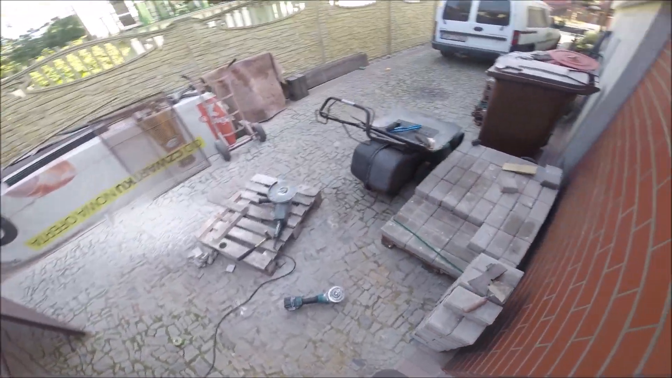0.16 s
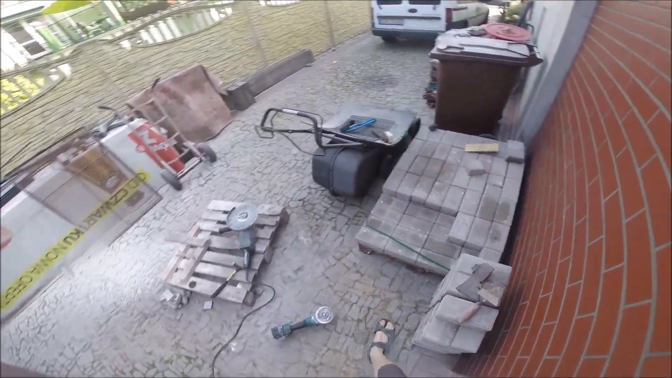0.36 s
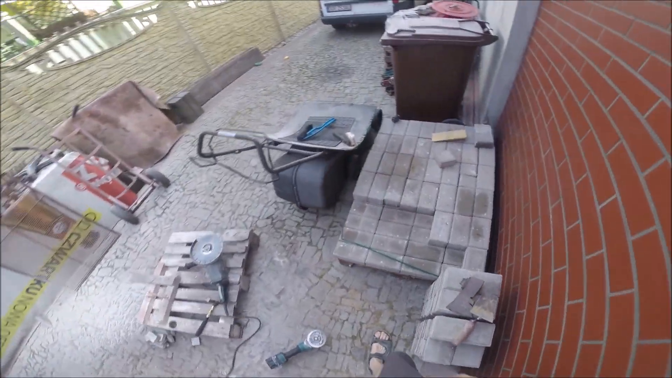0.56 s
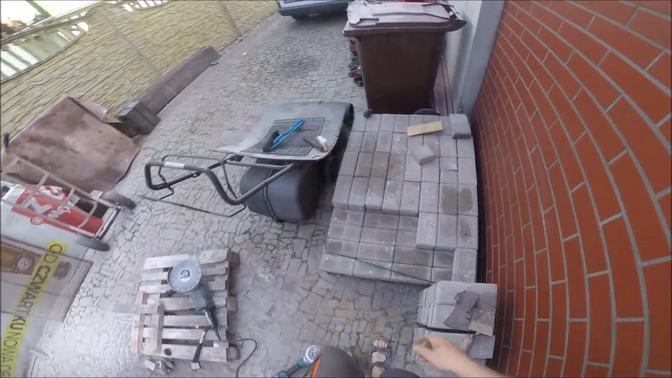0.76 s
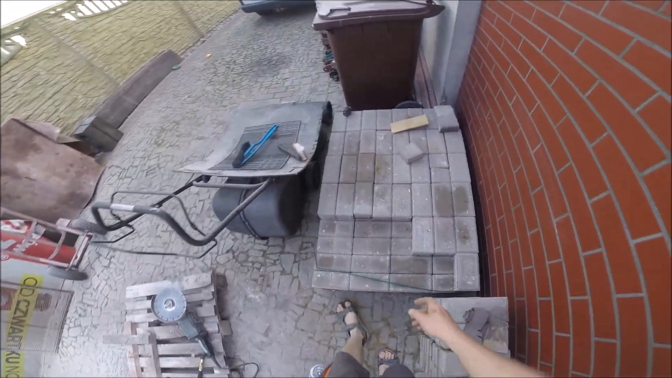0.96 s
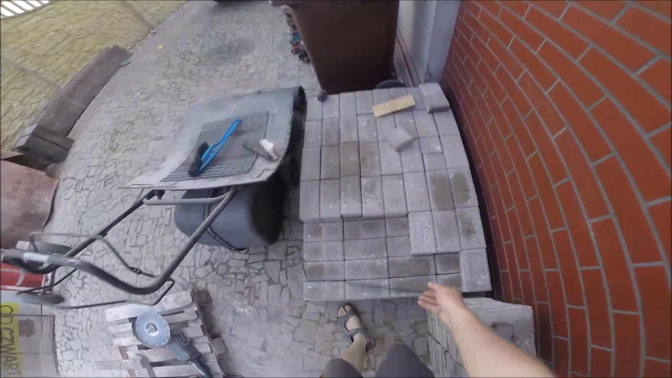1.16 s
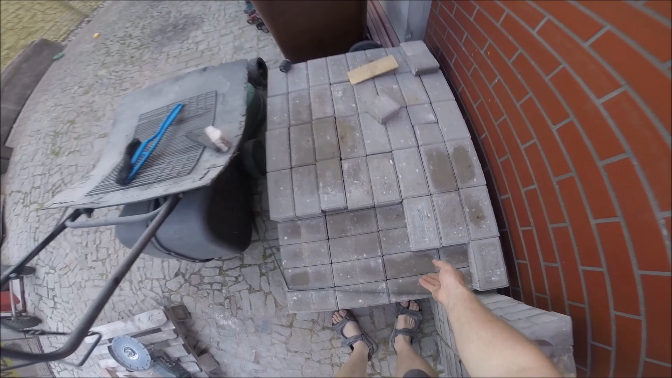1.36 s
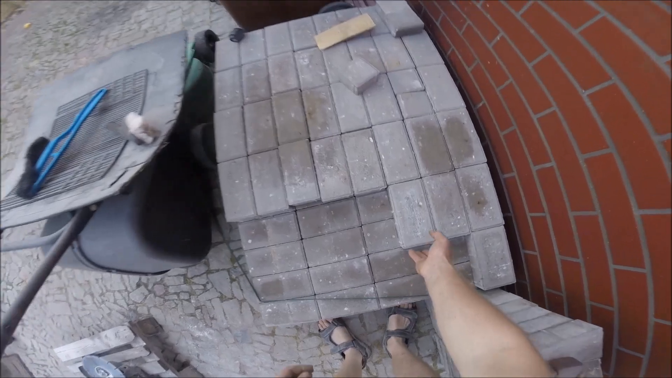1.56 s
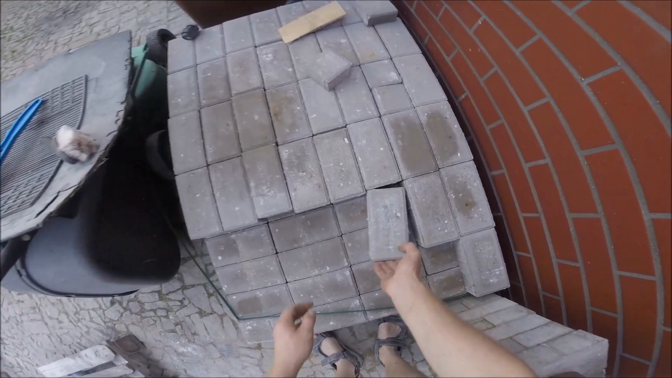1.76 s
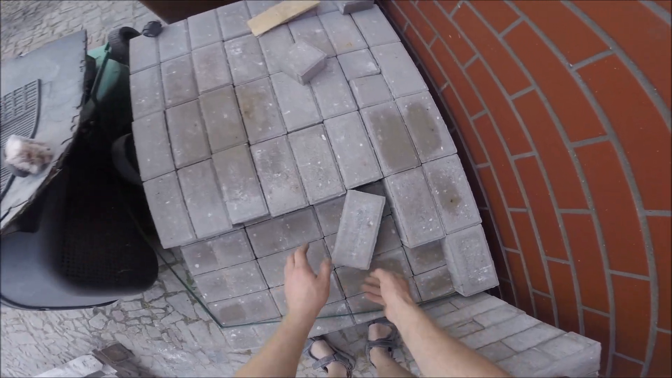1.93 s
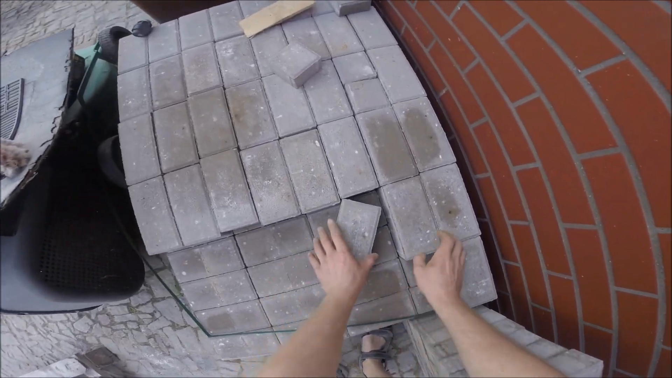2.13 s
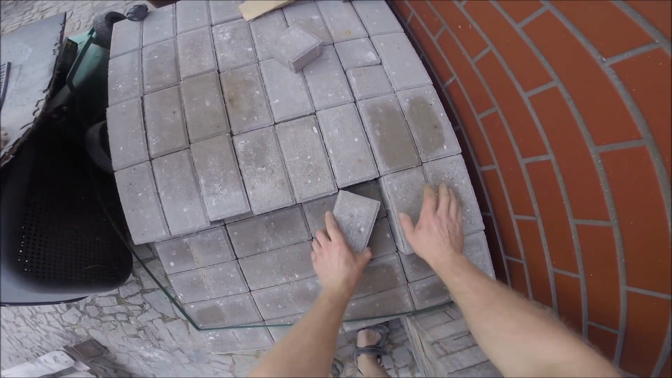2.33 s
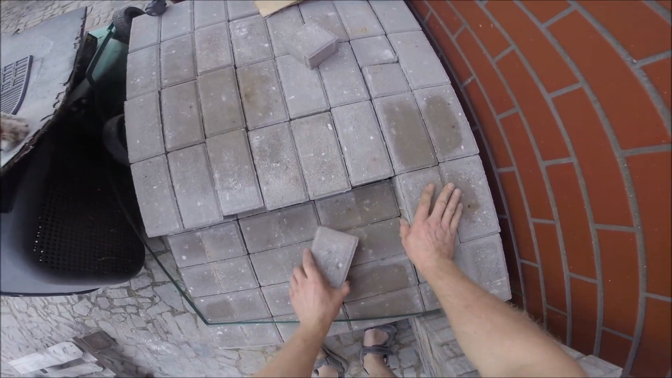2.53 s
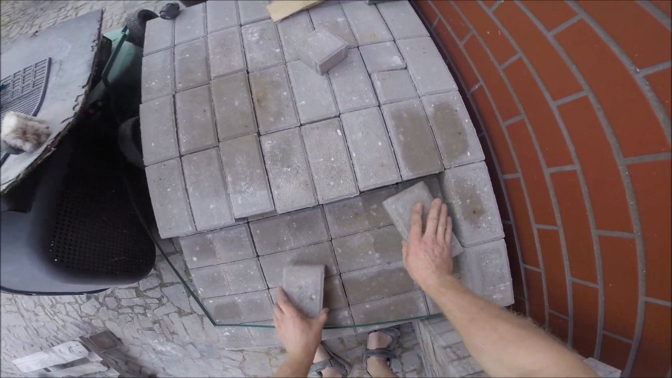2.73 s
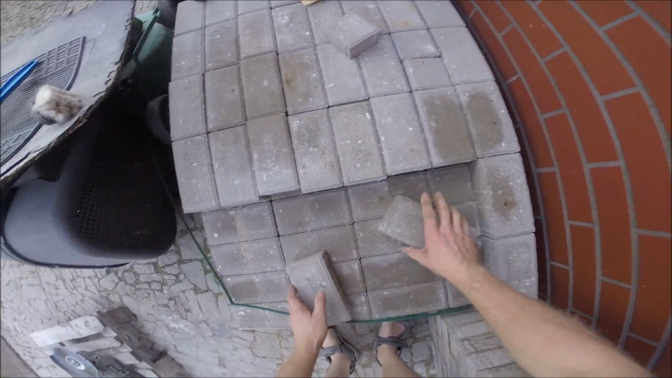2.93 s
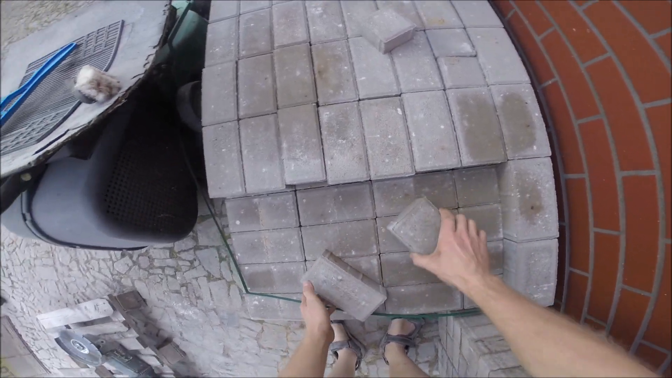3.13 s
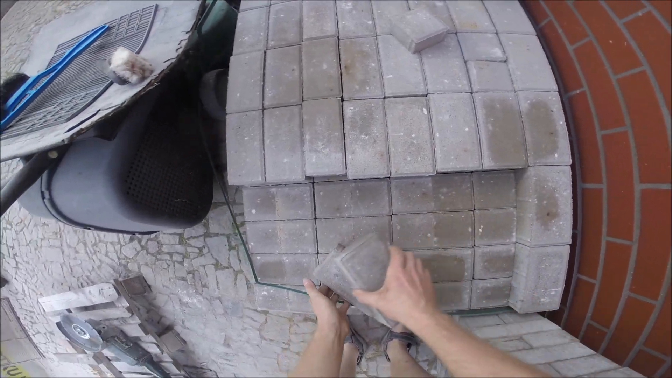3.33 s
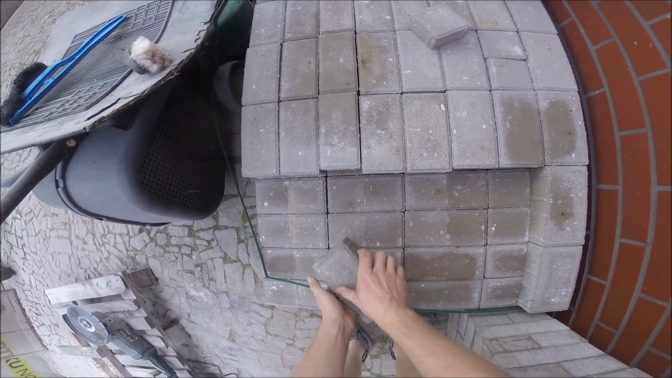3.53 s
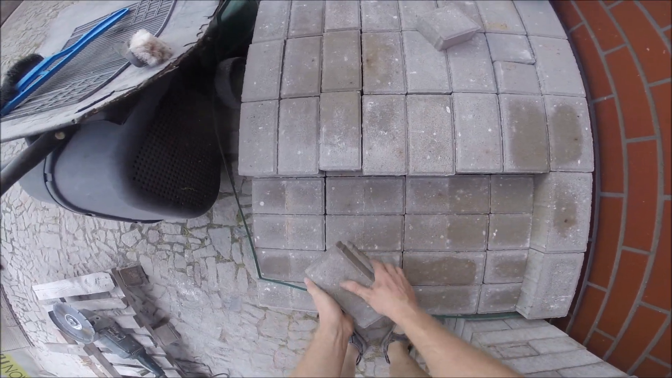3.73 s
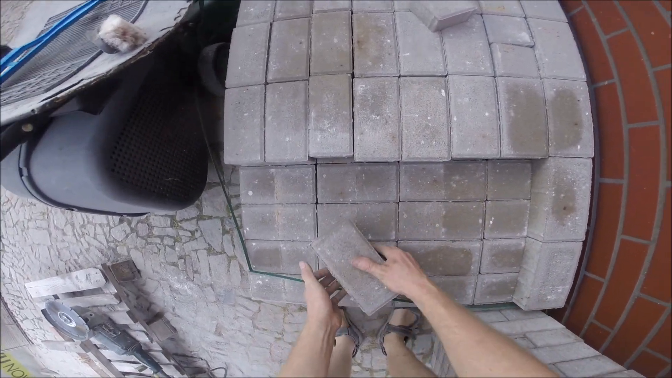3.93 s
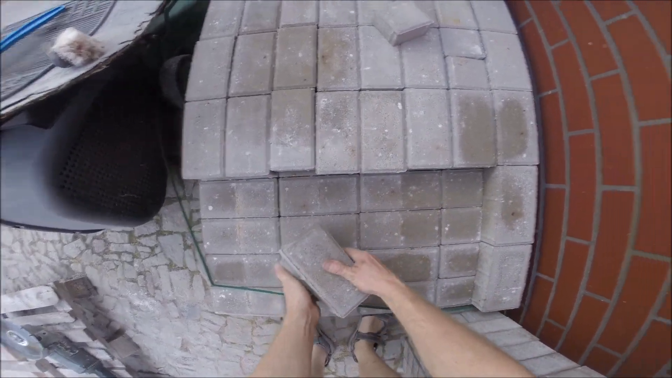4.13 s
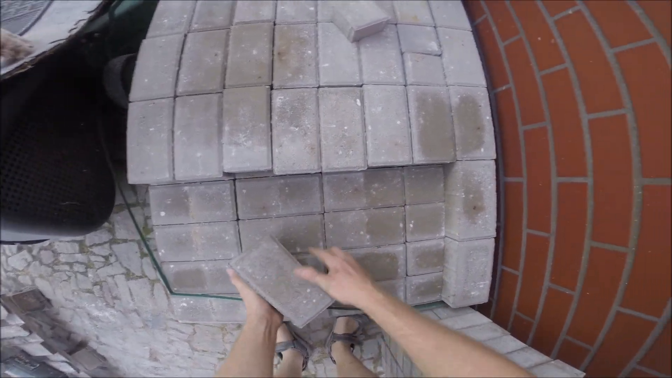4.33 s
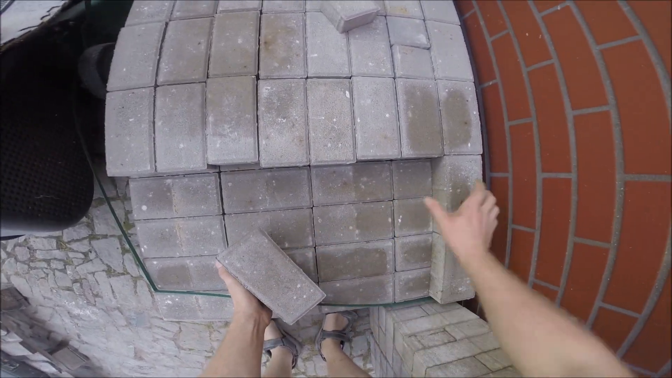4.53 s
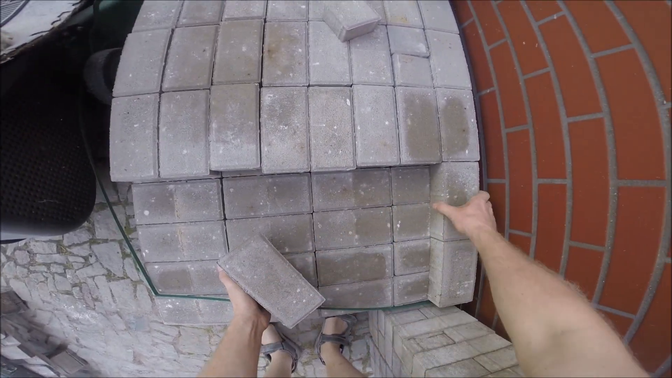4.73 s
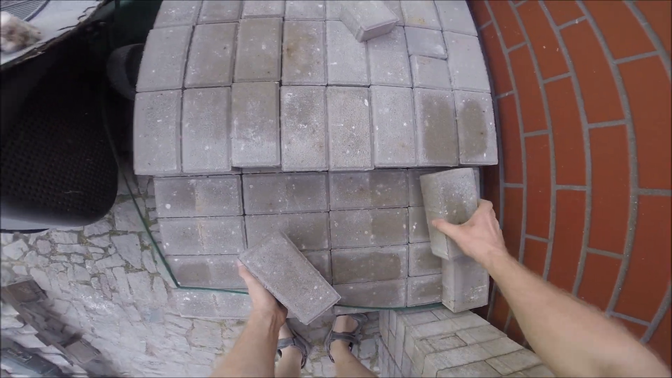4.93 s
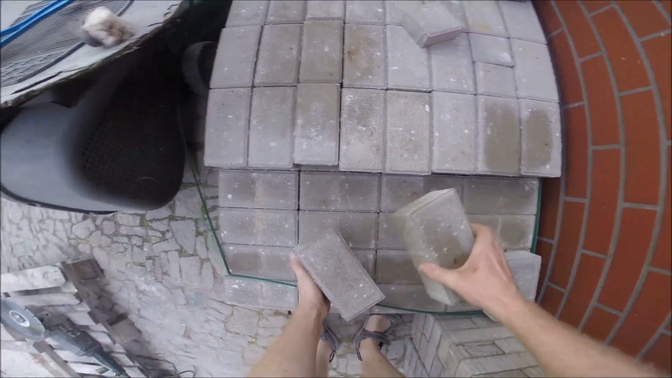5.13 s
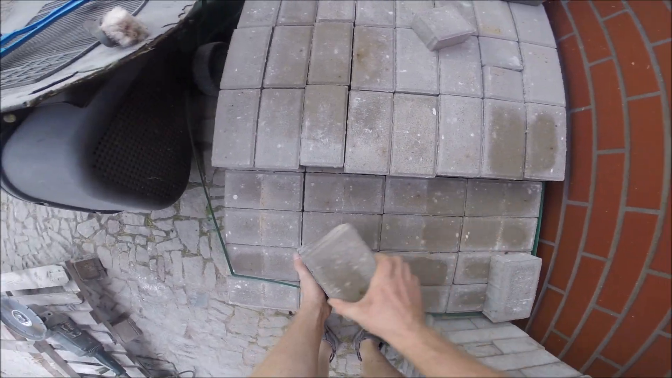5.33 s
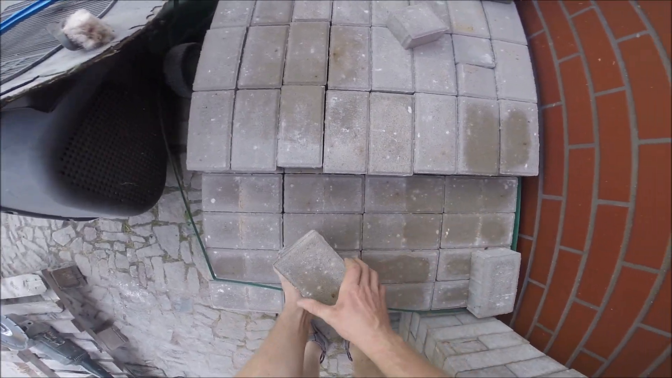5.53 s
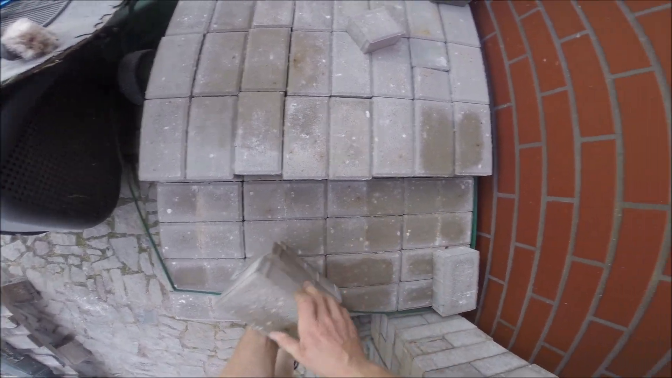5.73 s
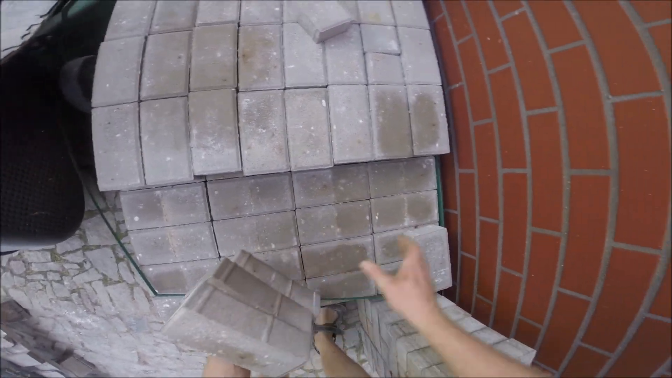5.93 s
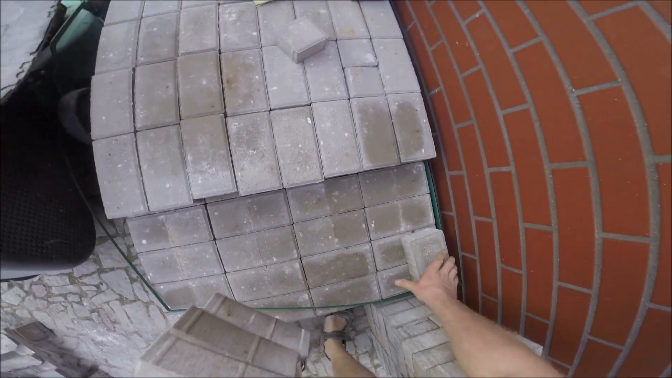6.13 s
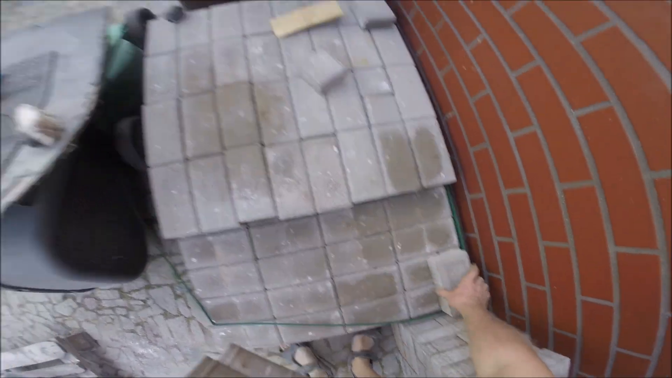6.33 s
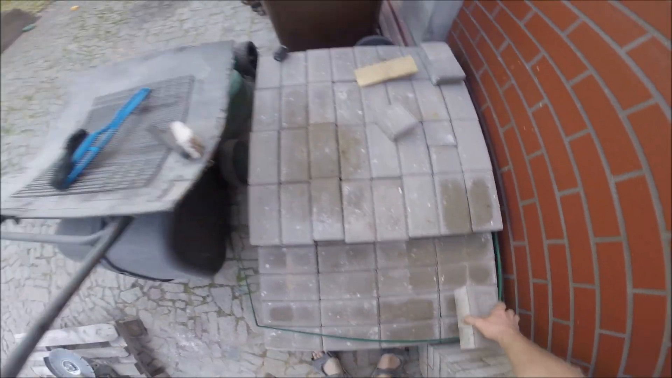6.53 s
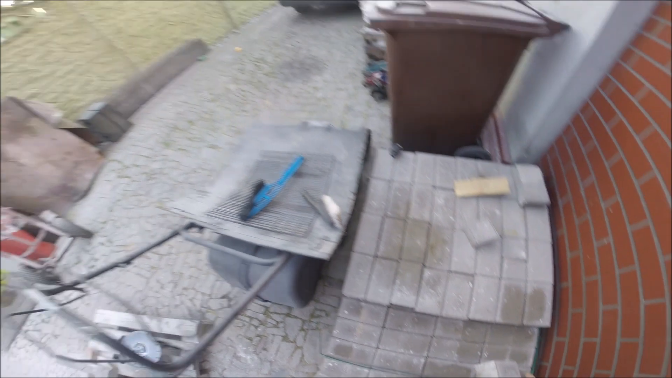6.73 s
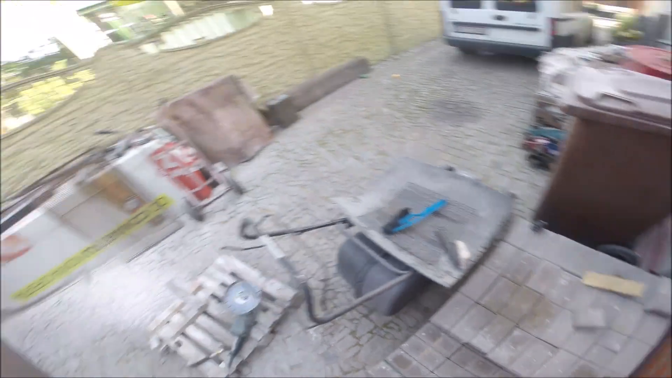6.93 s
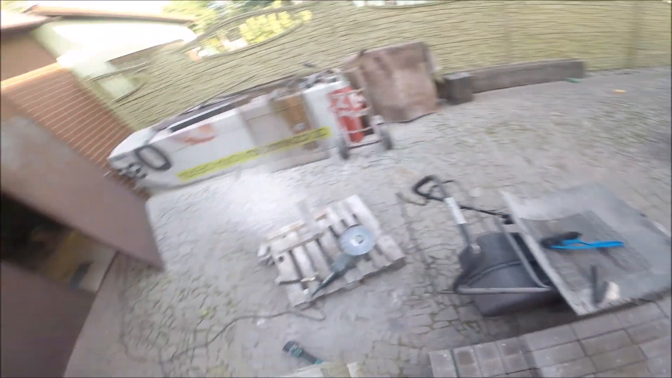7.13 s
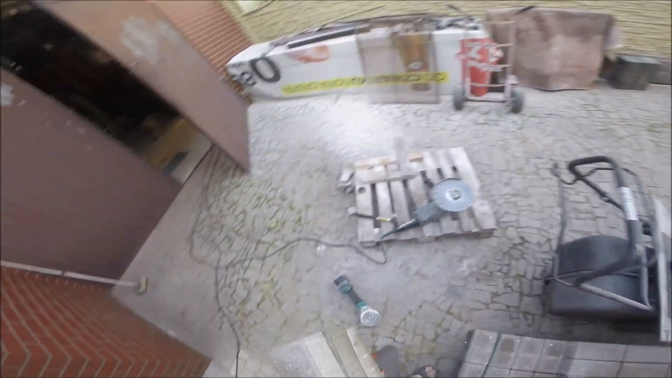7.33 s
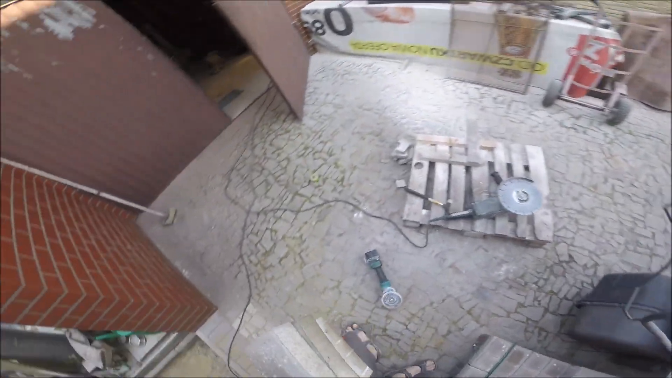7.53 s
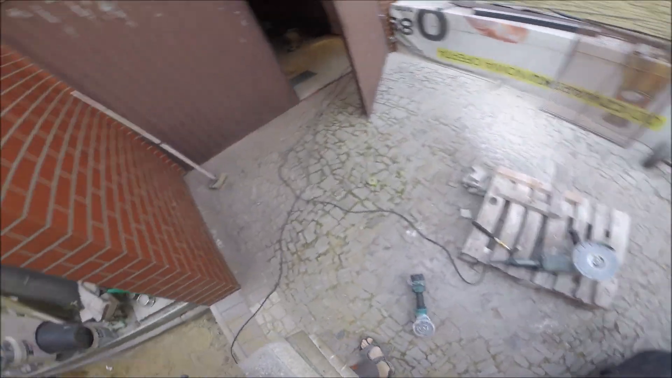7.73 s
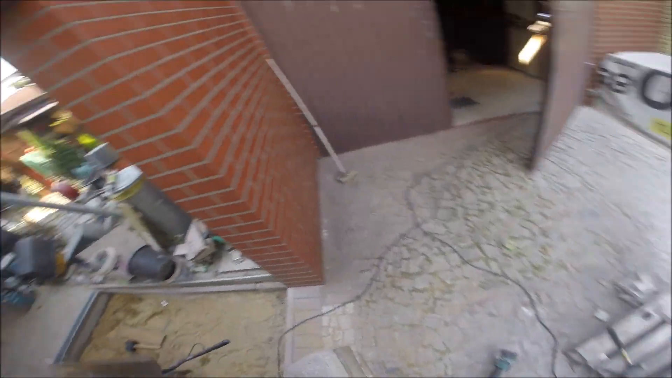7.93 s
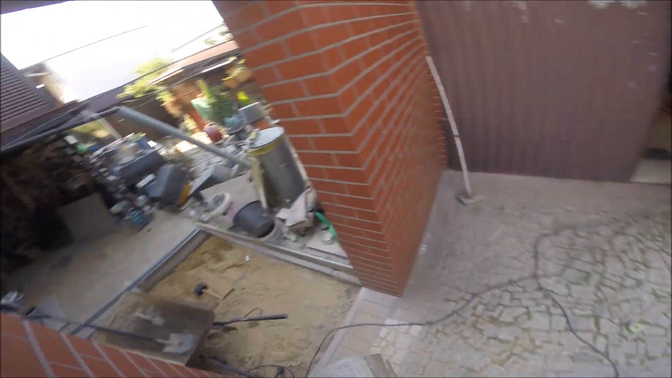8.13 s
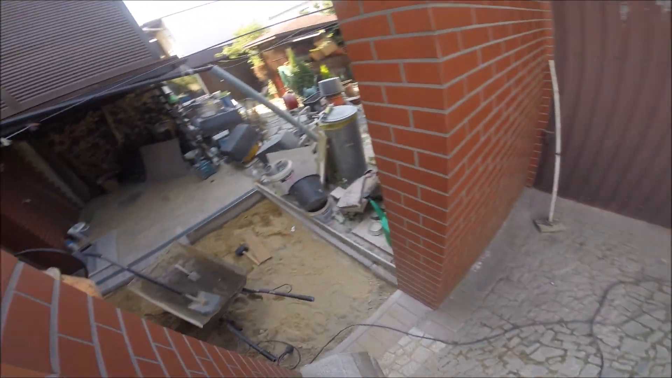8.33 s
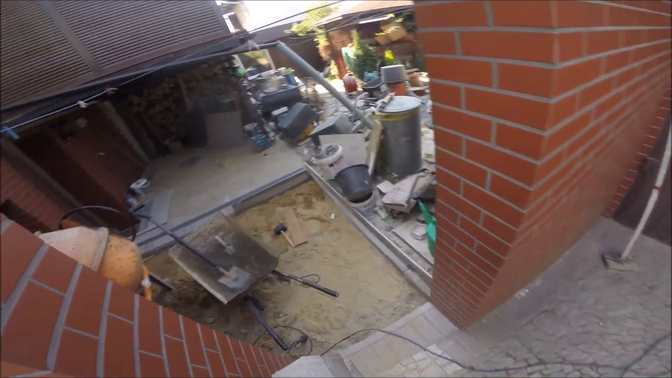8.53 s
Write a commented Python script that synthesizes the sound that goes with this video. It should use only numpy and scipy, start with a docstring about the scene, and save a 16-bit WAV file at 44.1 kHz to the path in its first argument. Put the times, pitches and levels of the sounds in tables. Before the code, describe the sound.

In a quiet yard, sandals tap and scuff on gritty cobbles. Very close to a body-worn microphone, concrete blocks bump and drag off a stack, with one long, loud, gritty pull and a hard clack of block on block. Shorter scrapes and knocks follow, then a second sharp clack, and finally light steps away over faint air and hum.

```python
"""Paving blocks off a pallet

Place: a yard. Close to a body-worn camera's microphone, concrete blocks are dragged off a stacked pallet.
Gritty stick-slip grinds and shakes the stack, edges bump on it, and twice a block is clacked on a held one.
Sandals tap and scuff on gritty cobbles before and after, over quiet air, a far hum, a whine and wind puffs.
Reflections come from the ground and walls; the camera's limiter ducks after peaks over full scale."""
import sys
import numpy as np
from scipy import signal
from scipy.fft import rfft, irfft, next_fast_len
from scipy.io import wavfile
from scipy.ndimage import uniform_filter1d, minimum_filter1d, map_coordinates

SR = 44100
rng = np.random.default_rng(int(sys.argv[2]) if len(sys.argv) > 2 else 0)


def store_pcm(level_fs):
    """Save levels as 16-bit WAV."""
    pcm = np.round(np.clip(level_fs, -1, 1) * 32767).astype(np.int16)
    wavfile.write(sys.argv[1], SR, np.atleast_2d(pcm).T)


N = 377937  # samples

# All levels in the tables are relative; each source sets its own trim.
# Short shoves of a block: [start t/s, time from start to hardest push t/s, length t/s,
# grinding level/dB, stack rumble level/dB, ringing level/dB]
DRAG_EVENTS = [(1.77, 0.18, 0.26, -25.5, -31, -49.5), (2.406, 0.018, 0.04, -37, -42, -59),
               (2.464, 0.12, 0.1, -32.5, -38, -49.5), (3.573, .005, 0.034, -41, -32, -64),
               (3.657, .008, 0.081, -28.5, -30.5, -48.5), (3.821, .012, 0.053, -37, -38, -58),
               (3.878, 0.036, .07, -31.5, -38.5, -57), (3.985, .02, .06, -33, -39.5, -60),
               (4.122, 0.085, .11, -25, -28, -48.5), (4.237, 0.012, 0.067, -58, -45, -83),
               (4.475, 0.014, 0.024, -41, -43.5, -60.5), (4.814, .09, 0.24, -34, -36.5, -55),
               (5.075, 0.0067, 0.022, -36, -39.5, -57.5)]
# The long pull across the stack: [t/s, grinding level/dB, ringing level/dB]
LONG_PULL = [(2.607, -40.5, -67), (2.615, -29, -41.5), (2.673, -28, -46.5), (2.681, -39.5, -53.5),
             (2.741, -21.5, -32.5), (2.771, -26.5, -66), (2.817, -15.5, -35), (2.829, -22, -57),
             (2.843, -13, -32), (2.863, -20.5, -47.5), (2.911, -19, -44), (3.015, -32, -57.5),
             (3.051, -29, -41), (3.067, -38.5, -52.5), (3.189, -32.5, -42.5), (3.335, -52.5, -79),
             (3.36, -62.5, -78)]
# Edges bumping on the stack: [t/s, blow level/dB, pitch f/Hz, thud level/dB]
BUMP_EVENTS = [(1.133, -22.5, 1020, -56), (1.829, -27.5, 1080, -61), (1.875, -14.5, 1000, -31),
               (1.922, -20.5, 1090, -26), (1.937, -17, 1010, -34), (1.978, -22, 1130, -26.5),
               (2.06, -19, 860, -31.5), (2.461, -21, 1090, -30), (2.492, -19.5, 1040, -46),
               (2.519, -18, 1190, -36), (2.547, -20, 1110, -51), (2.565, -18, 1110, -30.5),
               (2.621, -12.5, 960, -46), (2.663, -10.5, 840, -36), (2.715, -10.5, 950, -29),
               (2.814, -5.5, 850, -18), (2.901, -7.5, 980, -22), (2.920, -4, 1010, -32),
               (3.021, -19.5, 950, -28.5), (3.578, -22.5, 1040, -27.5), (3.886, -22.5, 1150, -43),
               (3.907, -18.5, 1150, -41), (3.985, -24.5, 1250, -52), (4.209, -19, 714, -34),
               (4.221, -19, 680, -31), (4.405, -37.5, 1000, -62), (4.486, -27.5, 1050, -54),
               (4.596, -43, 1080, -63), (4.736, -40.5, 1080, -64.5), (4.837, -19, 860, -32),
               (4.883, -20, 890, -30), (4.907, -15, 805, -44), (4.921, -10, 890, -51),
               (5.078, -20.5, 983, -45)]
# A block landing and rocking on the held one: [t/s, blow level/dB, pitch f/Hz, swing/cycles, ground echo level/dB,
# thud level/dB, edge snap level/dB, ring level/dB]; the last four stand against the blow
CLACK_EVENTS = [(3.6196, 0.5, 1260, 0.76, -14, -4, -8, -28),
                (3.6222, -9, 1960, 1.2, -19, 2.5, -13.5, -27.5),
                (3.6257, -3.5, 933, 1.1, -21, -10.5, -23, -30.5), (3.6399, -4, 903, .6, 0, -6, -6, -28.5),
                (5.5122, 4.5, 1320, 0.6, -13.5, -21.5, -28.5, -42.5),
                (5.518, 5, 1640, 0.96, -16, -21, -27.5, -23)]
# Sandals landing and scuffing: [t/s, tap level/dB, first crunch level/dB, sole rub level/dB,
# grit level/dB, scuff length t/s]
STEP_EVENTS = [(0.447, -47, -61, -47.5, -53.5, .22), (0.978, -37, -62, -50, -57.5, 0.099),
               (1.084, -33, -56.5, -54, -54, 0.07), (1.155, -49, -68, -47.5, -54, 0.13),
               (1.502, -25.5, -47.5, -47, -54, 0.18), (6.227, -33, -71, -61, -72, 0.035),
               (6.445, -33, -63, -61, -76, .05), (6.537, -37, -44, -42.5, -48.5, 0.073),
               (6.634, -47, -42, -44, -52, 0.18), (6.769, -37, -39.5, -44, -49, 0.167),
               (6.83, -39, -42.5, -55, -55, 0.03), (7.004, -37, -58.5, -48, -51.5, 0.048),
               (7.130, -45, -72, -52.5, -62, 0.29), (7.694, -26, -67, -46, -54.5, 0.15),
               (7.851, -52, -72, -53.5, -58.5, 0.14), (8.404, -53, -69, -53, -66.5, 0.18),
               (8.556, -53, -66, -54, -52.5, 0.098)]
# Puffs of wind on the microphone: [centre t/s, level/dB, half width to 1/e t/s]
WIND_PUFFS = [(6.75, -53.5, .09), (6.96, -55, .04), (7.89, -41, 0.032)]

# Ringing modes of the first blocks on the stack: [f/Hz, level/dB, t60/s]
FIRST_BLOCK_MODES = [(4045, -17, 0.039), (5760, -13, 0.029), (5680, -14.5, 0.042), (6233, 1, 0.048),
                     (7220, -22, 0.12), (12100, -28.5, 0.059), (12410, -21, 0.05)]
# Ringing modes of the block from the wall side: [f/Hz, level/dB, t60/s]
WALL_BLOCK_MODES = [(5720, -8, .06), (6170, -3, .035), (7490, -1, .07), (12050, -13, .04),
                    (12860, -19, .04)]
# How contact drives a block's modes: [f/Hz, level/dB]
CONTACT_DRIVE = [(3000, -7.5), (5000, 4.5), (6500, 1.5), (9000, -10.5), (12500, -7)]
# How well a block's face radiates a clap: [f/Hz, level/dB]
FACE_RADIATION = [(30, -19.5), (70, -8.5), (140, 0), (400, 2), (900, 0), (2000, 2.5), (2500, -6.5),
                  (3100, -3.5), (6000, 1)]

# Spectrum of block grinding on block: [f/Hz, level/dB per Hz]
GRIND_SPECTRUM = [(200, -42), (560, -15), (800, -1), (1000, 3), (1200, 1), (1470, -14.5), (1950, -10),
                  (2600, -28), (3100, -26.5), (3600, -32.5), (6500, -37), (9000, -54.5), (11000, -64.5),
                  (12400, -39), (15000, -73.5)]
# Spectrum of the shaken stack: [f/Hz, level/dB per Hz]
STACK_SPECTRUM = [(35, -41), (80, -19.5), (125, -2), (165, 4), (215, -6), (290, -1), (430, -3.5),
                  (620, -5.5), (900, -18.5), (2500, -68)]
# Spectrum of an edge snapping: [f/Hz, level/dB per Hz]
EDGE_SPECTRUM = [(900, -16), (1600, 2), (2000, 9), (2350, -9.5), (2650, -5.5), (3100, -8.5), (3700, -24.5),
                 (5000, -30), (7500, -48.5), (14000, -58)]
# Spectrum of a sole rubbing the cobbles: [f/Hz, level/dB per Hz]
SOLE_SPECTRUM = [(71, -51), (120, -8), (296, 2.5), (420, -3), (494, 6.5), (557, -0.5), (1060, 5.5),
                 (3000, -35), (3900, -35.5), (6600, -120)]
# Spectrum of crunching grit: [f/Hz, level/dB per Hz]
GRIT_SPECTRUM = [(1000, -10), (2000, 3.5), (3000, 1.5), (4000, 3), (4900, -9.5), (7200, -5.5),
                 (9000, -18.5), (15000, -28.5)]
# Spectrum of wind at the microphone: [f/Hz, level/dB per Hz]
WIND_SPECTRUM = [(20, -0.5), (60, 0), (120, -20), (300, -35), (1000, -80)]
# Spectrum of the outdoor air: [f/Hz, level/dB per Hz]
AIR_SPECTRUM = [(12, -26), (20, 2.5), (97, -3.5), (124, -4), (387, -9.5), (421, -9.5), (497, -6.5),
                (1590, -18), (2930, -21.5), (7930, -31.5), (9110, -34.5), (12400, -39), (15000, -36)]
# Far machine hum and the camera's thin whine: [f/Hz, level/dB]
HUM_AND_WHINE = [(96.9, -67), (393.0, -74), (5846, -84), (8780, -78), (11687, -87), (11719, -83),
                 (14626, -82.5), (14653, -91)]
# Decay of the yard's diffuse answer: [f/Hz, t60/s]
YARD_DECAY = [(150, .4), (700, 0.58), (1700, 0.27), (4000, .25), (6200, .33), (10000, 0.078)]

WALL_BLOCK_FROM_S = 4.35  # from here on the wall-side block is handled
BITE_S, STOP_S = 0.0065, 0.027  # a block starts to slide; its grinding dies once it stops
SWELL_DB, EASE_DB = 18, 11.5  # a push builds by this much up to its hardest point, then eases by this much
PULL_GRIND_DB, PULL_RING_DB = 0.5, 1
PULL_RUMBLE_DB, RUMBLE_GROWS = -10.5, 0.83  # dB of rumble per dB of grinding
BUMP_RING_DB = -30.5  # the block's ring against a bump's blow level
FREE_RING = 1.9  # clacked blocks ring this many times as long
SCUFF_LEAD_S, SCUFF_ATTACK_S, SCUFF_RELEASE_S = 0.018, 0.033, 0.034  # the sole brushes the ground before landing
SCUFF_FADE_DB = 13  # lost over the length of a scuff
TAP_HZ, TAP_SCATTER = 860, 0.069  # centre pitch of a tap, and its random spread as a share
HEEL_DB = -25  # heel thump against the step's tap level
TOP_HZ = 15300  # the camera's band limit


def drags():
    """Sand grains catch and slip between the faces; they shake the stack and keep the block ringing."""
    friction = amp(-2.5) + slips(rate=110, life_s=0.0038, spread_db=5)
    catches = unit(friction * grains(rate=2500, spread_db=0.5))
    grinding = amp(-2.5) * unit(coloured(catches, GRIND_SPECTRUM))
    rumble = amp(1.0) * unit(coloured(catches, STACK_SPECTRUM))
    drive = coloured(catches, CONTACT_DRIVE)

    first_gains = pushes([row for row in DRAG_EVENTS if row[0] < WALL_BLOCK_FROM_S]) + long_pull()
    wall_gains = pushes([row for row in DRAG_EVENTS if row[0] >= WALL_BLOCK_FROM_S])
    out = np.zeros(N)
    for gains, modes in (first_gains, FIRST_BLOCK_MODES), (wall_gains, WALL_BLOCK_MODES):
        grind_gain, rumble_gain, ring_gain = gains
        ringing = amp(2) * unit(resonate(drive, modes))
        out += grind_gain * grinding + rumble_gain * rumble + ring_gain * ringing
    return out


def pushes(rows):
    """Gains of grinding, rumble and ringing: one swelling and easing push drives all three."""
    gains, t = np.zeros((3, N)), np.arange(N) / SR
    for s, rise_s, length_s, *levels_db in rows:
        push_db = np.interp(t - s, [0, rise_s, max(length_s, rise_s)], [-SWELL_DB, 0, -EASE_DB])
        gains += amp(levels_db)[:, None] * amp(push_db) * stroke(s, length_s, BITE_S, STOP_S)
    return gains


def long_pull():
    """The same three gains for the long pull; the rumble follows the grinding, growing more slowly."""
    s, *columns = np.transpose(LONG_PULL)
    t = np.arange(N) / SR
    grind_db, ring_db = [np.interp(t, s, column, -np.inf, -np.inf) for column in columns]
    rumble_db = RUMBLE_GROWS * grind_db + PULL_RUMBLE_DB
    return amp([grind_db + PULL_GRIND_DB, rumble_db, ring_db + PULL_RING_DB])


def bumps():
    """An edge drops on the stack: a dull clap, a thud, a faint ring, and the brick wall's quick echo."""
    out, t = np.zeros(N), np.arange(SR // 5) / SR
    for s, db, hz, thud_db in BUMP_EVENTS:
        snap = amp(-26 - 60 * t / 0.017) * unit(coloured(rng.standard_normal(len(t)), EDGE_SPECTRUM))
        face = clap(t, hz, cycles=0.58)
        thud = amp(thud_db + 1.0) * clap(t, hz=280, cycles=0.43)
        blow = scattered(amp(db - 2.0) * (face + snap) + thud, t, db=-6, t60=0.035)
        modes = FIRST_BLOCK_MODES if s < WALL_BLOCK_FROM_S else WALL_BLOCK_MODES
        add(out, s, blow + amp(db + BUMP_RING_DB) * ring(t, modes))
        wall_delay_s = rng.uniform(0.0028, 0.0042)
        add(out, s + wall_delay_s, amp(-6) * blow)
    return out


def clacks():
    """Face meets face: a hard clap and the snap of an edge, thrown back by the ground and then the wall."""
    out, t = np.zeros(N), np.arange(SR // 4) / SR
    free_modes = [(hz, db, FREE_RING * t60) for hz, db, t60 in FIRST_BLOCK_MODES]
    for s, db, hz, cycles, echo_db, thud_db, snap_db, ring_db in CLACK_EVENTS:
        snap = amp(snap_db - 60 * t / 0.025) * unit(coloured(rng.standard_normal(len(t)), EDGE_SPECTRUM))
        thud = clap(t, hz=770, cycles=0.53) + amp(-12) * clap(t, hz=290, cycles=0.52)
        faces = coloured(clap(t, hz, cycles) + amp(thud_db) * thud, FACE_RADIATION)
        body = amp(db) * scattered(faces, t, db=-5, t60=0.037)
        add(out, s, body + amp(db) * (snap + amp(ring_db) * ring(t, free_modes)))
        add(out, s + 0.0073, amp(echo_db) * body)  # ground
        add(out, s + 0.0166, amp(-19) * body)  # wall
    return out


def footsteps():
    """Each sole taps the cobbles, then rubs on with fading force, crunching loose grit in little bursts."""
    pressure = amp(3.5) + slips(rate=90, life_s=0.0053, spread_db=8)
    sole = unit(pressure * coloured(grains(rate=2300, spread_db=2.5), SOLE_SPECTRUM))
    grit = amp(-0.5) * unit(coloured(pressure * grains(rate=1500, spread_db=-2.5), GRIT_SPECTRUM))
    out, t = np.zeros(N), np.arange(SR // 8) / SR
    for s, tap_db, crunch_db, sole_db, grit_db, length_s in STEP_EVENTS:
        progress = np.clip((np.arange(N) / SR - s) / length_s, 0, 1)
        gate = stroke(s - SCUFF_LEAD_S, length_s, SCUFF_ATTACK_S, SCUFF_RELEASE_S)
        scuff = amp(-SCUFF_FADE_DB * progress) * gate
        out += scuff * (amp(sole_db) * sole + amp(grit_db) * grit)

        spiky = rng.standard_normal(len(t)) ** 3
        crunch = amp(crunch_db - 60 * t / 0.061) * unit(coloured(spiky, GRIT_SPECTRUM))
        hz = TAP_HZ * np.exp(TAP_SCATTER * rng.standard_normal())
        tap = amp(-8) * scattered(clap(t, hz, cycles=0.58), t, db=2.0, t60=0.094)
        heel = amp(HEEL_DB) * clap(t, hz=98, cycles=0.42)
        add(out, s, crunch + amp(tap_db) * (tap + heel))
    return out


def slips(rate, life_s, spread_db):
    """Stick and slip: jerks of uneven size at uneven intervals, each dying quickly; rms 1."""
    times = np.cumsum(rng.uniform(0.3, 1.7, size=3000)) / rate
    sizes = amp(spread_db * rng.uniform(-1, 1, size=3000))
    jerks = np.bincount((times * SR).astype(int), sizes, minlength=N)[:N]
    return unit(signal.lfilter([1], [1, -np.exp(-1 / (life_s * SR))], jerks))


def grains(rate, spread_db):
    """Random tiny impacts of uneven size and either sign, about rate a second; rms 1."""
    hits = rng.random(N) < rate / SR
    sizes = amp(spread_db * np.clip(rng.standard_normal(N), -2, 2))
    return unit(hits * sizes * rng.choice([-1, 1], N))


def clap(t, hz, cycles):
    """Air squeezed between two faces: a swing that peaks after some cycles and dies at once."""
    u = t * hz / cycles
    return u * np.exp(1 - u) * np.sin(2 * np.pi * hz * t)


def ring(t, modes):
    """A block's modes after one contact, driven by brief chatter of the faces; peak 1."""
    chatter = coloured(rng.standard_normal(len(t)) * amp(-60 * t / 0.0067), CONTACT_DRIVE)
    x = resonate(chatter, modes)
    return x / np.abs(x).max()


def resonate(x, modes):
    """x kept ringing in a block's modes, each a resonance as wide as its t60 asks."""
    def response(f):
        total = 0
        for hz, db, t60 in modes:
            width = np.log(1000) / np.pi / t60  # Hz
            total = total + amp(db) * 1j * f * width / (hz * hz - f * f + 1j * f * width)
        return total
    return filtered(x, response)


def stroke(start_s, length_s, attack_s, release_s):
    """A gate that opens, holds and dies away."""
    t = np.arange(N) / SR - start_s
    return np.clip(t / attack_s, 0, 1) * np.exp(-np.maximum(t - length_s, 0) / release_s)


def scattered(x, t, db, t60):
    """x plus its dense early reflections from stack, body and wall."""
    cloud = rng.standard_normal(len(t)) * amp(-60 * t / t60) * (t > 0.002)
    return x + amp(db) * signal.fftconvolve(x, cloud / np.linalg.norm(cloud))[:len(x)]


def yard(x):
    """The walls' diffuse answer, arriving late, each frequency dying at its own speed."""
    hz, t, z = signal.stft(rng.standard_normal(SR // 2), SR, nperseg=256)
    decay = amp(-60 * t / along(YARD_DECAY, hz)[:, None])
    tail = signal.istft(z * decay, SR, nperseg=256)[1]
    late_tail = np.pad(tail / np.linalg.norm(tail), (SR // 80, 0))
    return signal.fftconvolve(x, late_tail)[:N]


def wind():
    """Moving the camera brushes air over the microphone: low noise in brief swells."""
    t = np.arange(N) / SR
    puffs = sum(amp(db) * np.exp(-((t - s) / width_s) ** 2) for s, db, width_s in WIND_PUFFS)
    return amp(-5.5) * unit(coloured(rng.standard_normal(N), WIND_SPECTRUM)) * puffs


def background():
    """Quiet outdoor air as noise, with a far hum and a thin electronic whine as wavering sines."""
    t = np.arange(N) / SR
    air = amp(-55.5 + 0.41 * wobble(1.8)) * unit(coloured(rng.standard_normal(N), AIR_SPECTRUM))
    tones = np.zeros(N)
    for hz, db in HUM_AND_WHINE:
        tones += amp(db) * np.sqrt(2) * np.sin(2 * np.pi * hz * t + 0.7 * wobble(3.9))
    return air + amp(0.5) * tones


def wobble(rate):
    """A smooth random curve, rate knots a second."""
    knots = rng.standard_normal(int(N * rate / SR) + 4)
    return map_coordinates(knots, [np.arange(N) * rate / SR])


def amp(db):
    """Decibels to amplitude."""
    return 10 ** (np.asarray(db) / 20)


def unit(x):
    """x scaled to rms 1."""
    return x / np.sqrt(np.mean(x ** 2) + 1e-20)


def along(points, hz):
    """(f/Hz, value) points read on a log frequency axis."""
    f, v = np.transpose(points)
    return np.interp(np.log(hz + 1), np.log(f), v)


def filtered(x, response):
    """x times a response of frequency."""
    m = next_fast_len(len(x) + 8192)  # room for the ringing
    return irfft(rfft(x, m) * response(np.fft.rfftfreq(m, 1 / SR)), m)[:len(x)]


def coloured(x, spectrum, size=4096):
    """x through a causal minimum-phase filter with the given spectrum."""
    cepstrum = irfft(np.log(amp(along(spectrum, np.fft.rfftfreq(size, 1 / SR)))))
    # folding the cepstrum forward puts the filter's energy at its start
    cepstrum[1:size // 2] *= 2
    cepstrum[size // 2 + 1:] = 0
    return signal.fftconvolve(x, irfft(np.exp(rfft(cepstrum))))[:len(x)]


def add(track, s, sound):
    """Mix a sound into the track at time s."""
    part = track[round(s * SR):][:len(sound)]
    part += sound[:len(part)]


def scene():
    """Close sources, the yard's answer to them, then air, hum, whine and wind at the microphone."""
    near = drags() + bumps() + clacks() + footsteps()
    return (near + amp(-26.5) * yard(near) + background() + wind())[None]


def limiter(x, hold_s, release_db):
    """Gain drops just ahead of a peak over full scale, holds, then climbs back by release_db a second."""
    over_db = np.maximum(20 * np.log10(np.abs(x) + 1e-9), 0)
    half = int(hold_s * SR / 2)
    ahead = 10  # samples
    held_db = -minimum_filter1d(-over_db, 2 * half + 1, origin=half - ahead)
    climb_db = release_db * np.arange(N) / SR
    cut_db = np.maximum.accumulate(held_db + climb_db) - climb_db
    return x * amp(-uniform_filter1d(cut_db, size=24))


def record(dry):
    """The camera limits the peaks, clips what is left over, and keeps nothing above its band limit."""
    held = np.clip(limiter(dry[0], hold_s=0.26, release_db=17), -1, 1)
    return filtered(held, lambda hz: hz < TOP_HZ)[None]


dry = scene()
out = record(dry)
store_pcm(out)
```